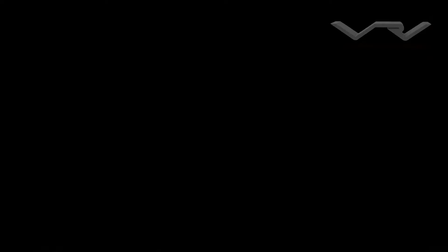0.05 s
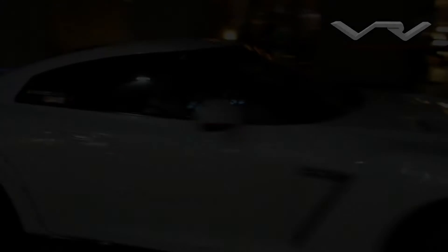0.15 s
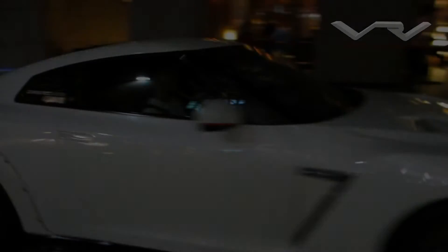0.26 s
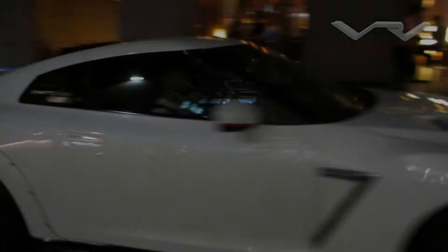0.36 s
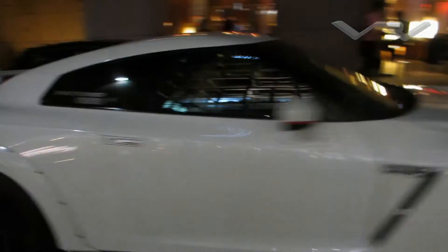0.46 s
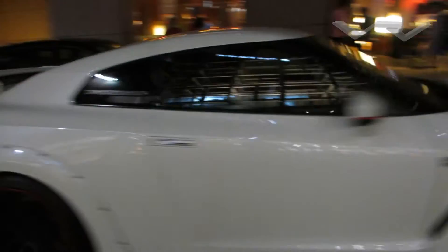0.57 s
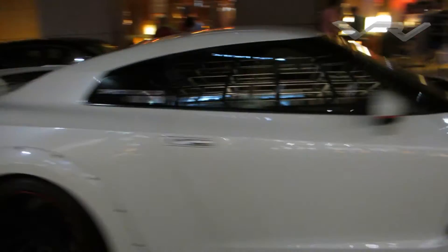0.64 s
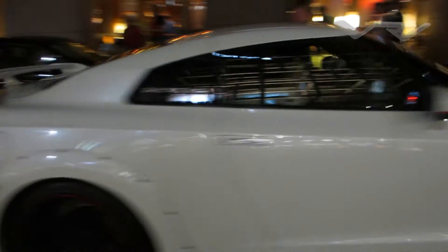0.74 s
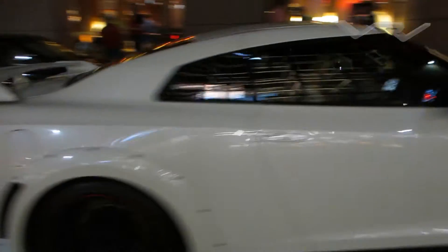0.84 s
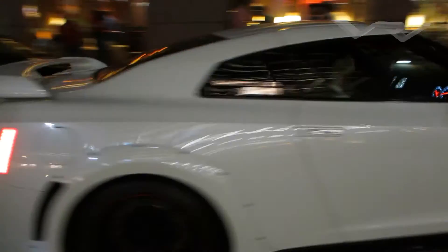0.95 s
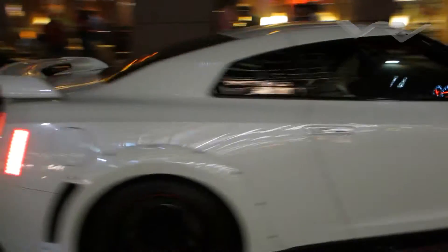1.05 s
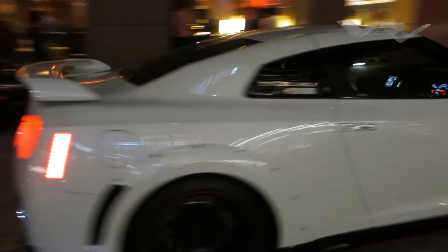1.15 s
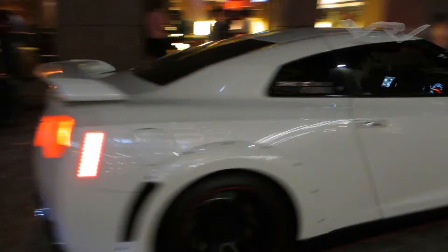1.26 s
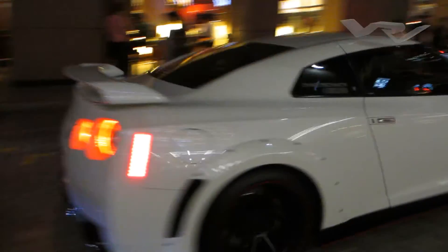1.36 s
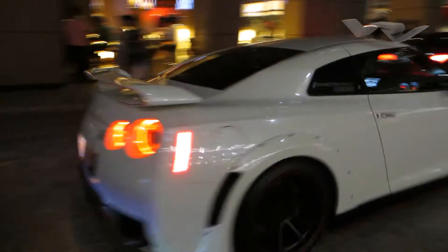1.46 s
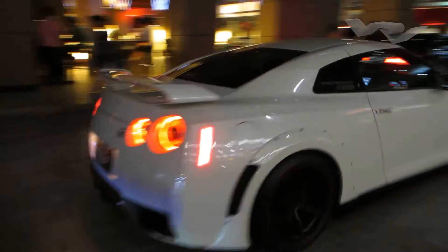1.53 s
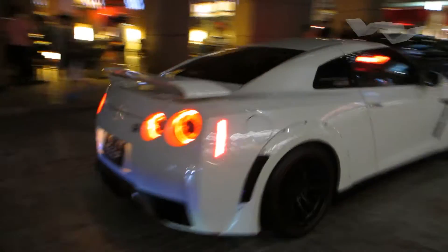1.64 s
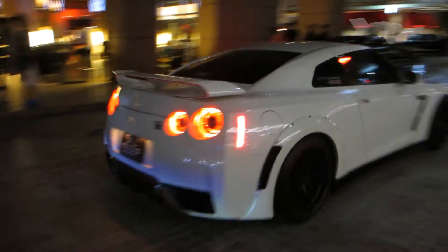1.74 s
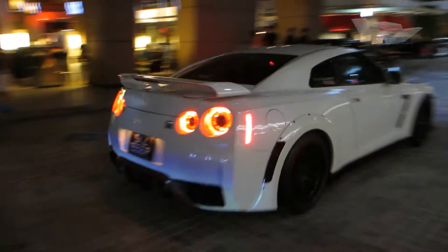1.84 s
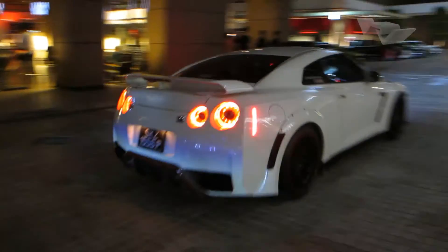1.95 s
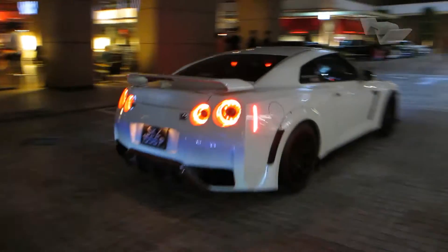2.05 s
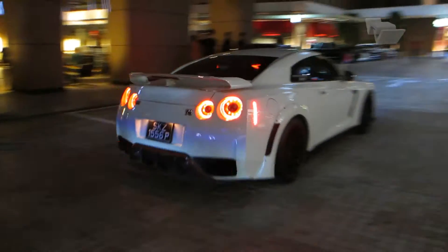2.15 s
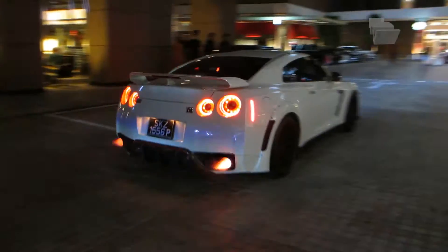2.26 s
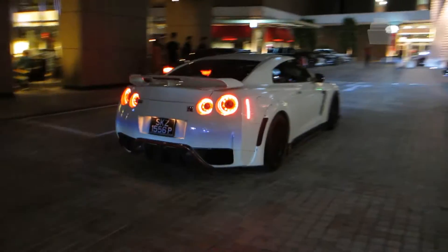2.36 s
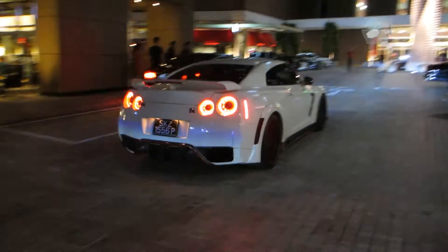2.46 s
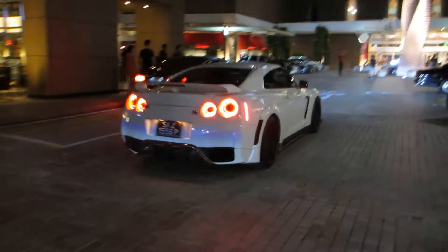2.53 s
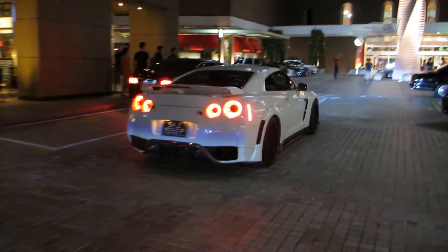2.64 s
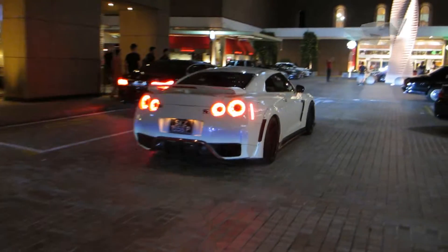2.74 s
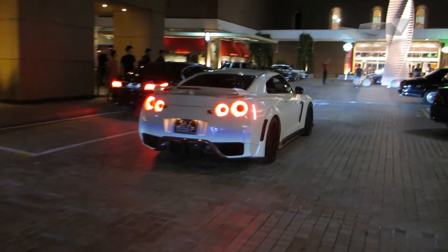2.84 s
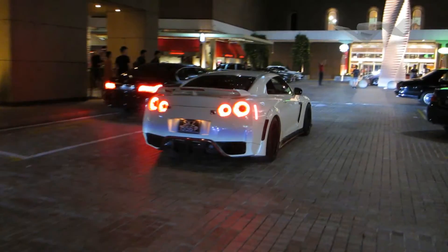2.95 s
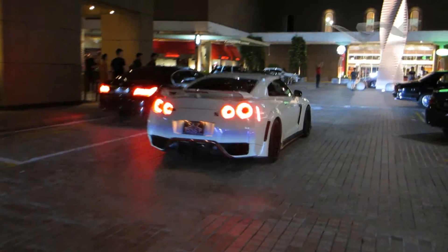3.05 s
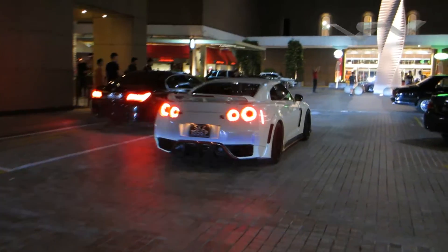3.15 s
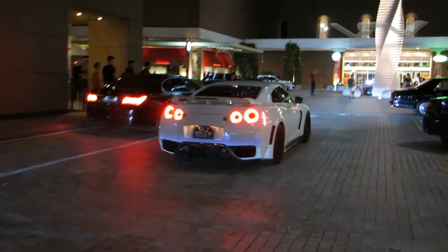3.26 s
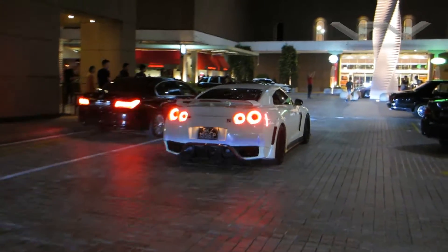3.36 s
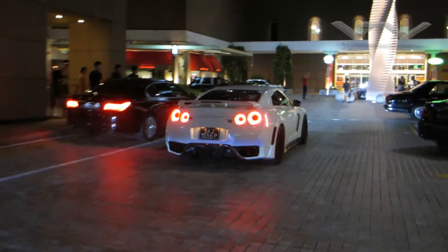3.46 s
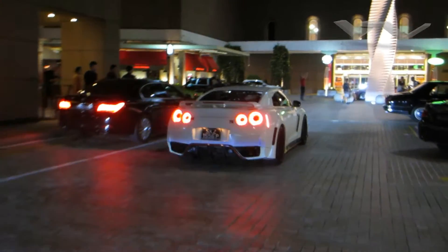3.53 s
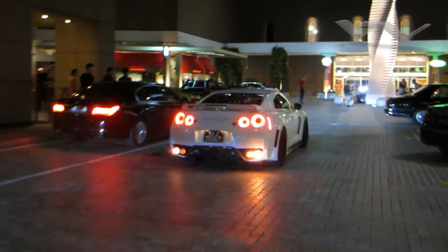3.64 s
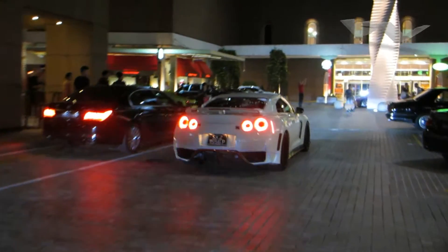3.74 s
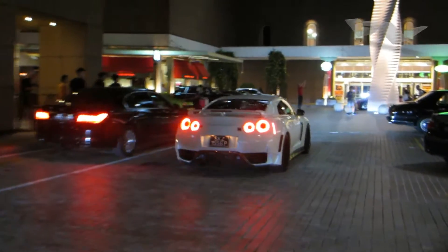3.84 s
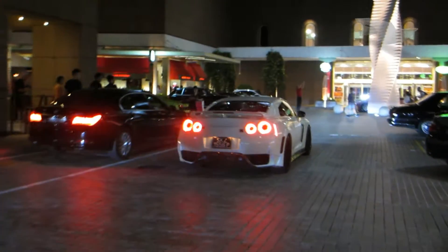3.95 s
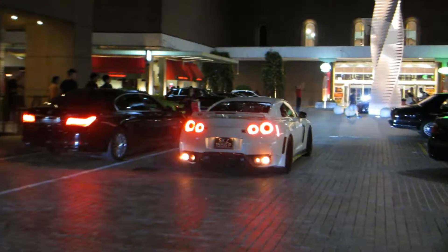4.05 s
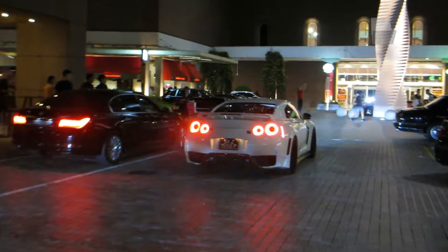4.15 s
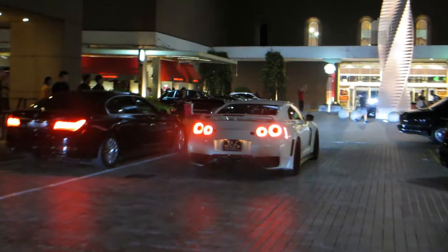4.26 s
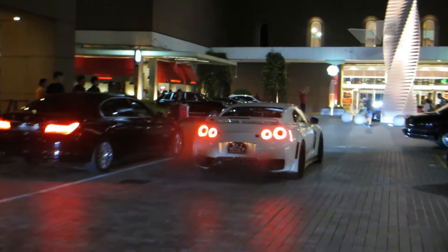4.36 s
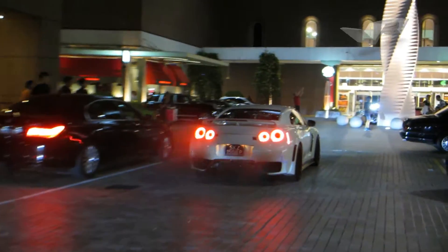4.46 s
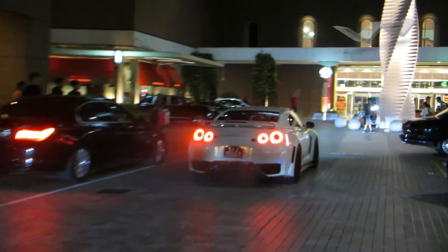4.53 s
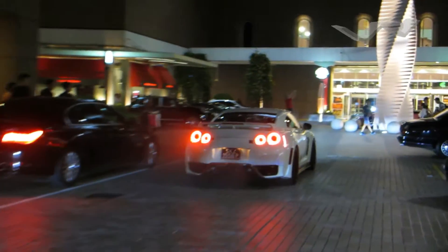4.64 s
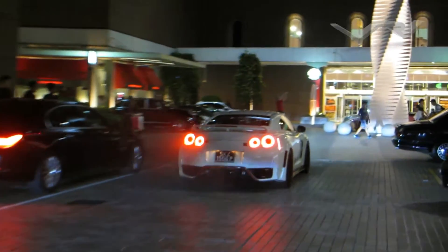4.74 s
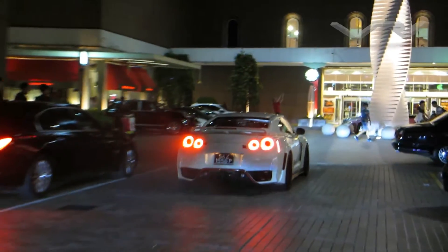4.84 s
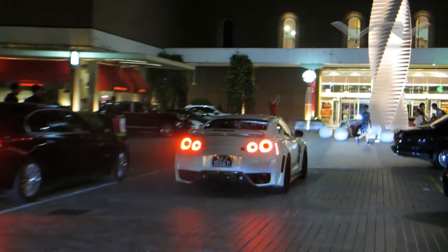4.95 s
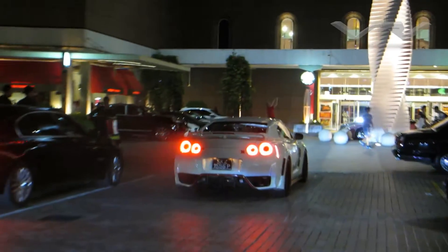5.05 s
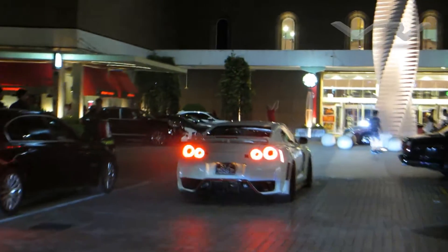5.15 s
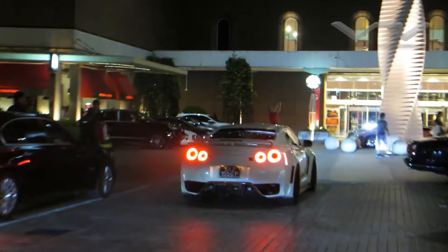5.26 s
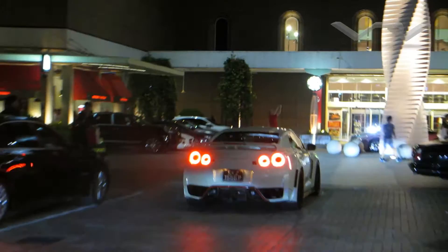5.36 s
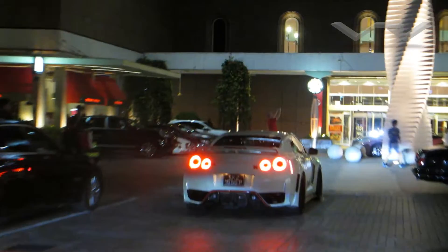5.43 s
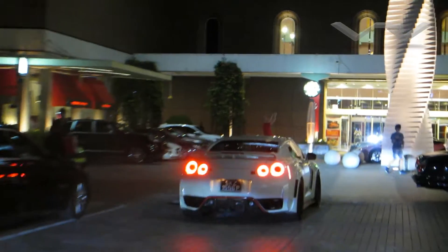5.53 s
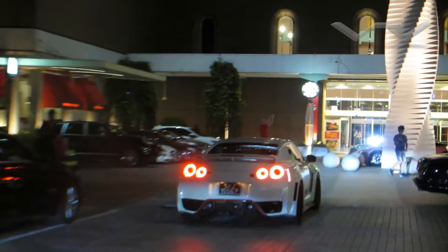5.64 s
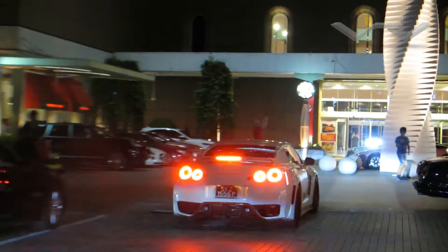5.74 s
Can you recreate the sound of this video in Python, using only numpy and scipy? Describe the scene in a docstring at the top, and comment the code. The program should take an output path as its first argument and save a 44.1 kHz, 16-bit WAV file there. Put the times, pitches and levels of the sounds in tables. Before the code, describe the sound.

After a brief silence, a tuned turbo engine murmurs close by, lugs as the clutch bites, then climbs into a raspy snarl. Lifting off sets off a volley of sharp cracks and pops. A shorter second rev brings heavier bangs echoing off buildings, then a quick blip and soft pops as the car rolls away. Outdoor paved forecourt, handheld stereo pickup, car leaning right.

```python
"""A tuned turbo V6 murmurs at low speed, lugs as the clutch bites, then snarls away over a forecourt.
It revs twice strongly and once briefly: speed and throttle shape the firings, which ring the
silencer and tailpipes. Unburnt fuel bangs, pops and burbles, mostly off the throttle, as decaying
rings, thumps and noisy cracks. Filtered noise makes the hiss; a wavering tone, the faint turbo.
Delayed copies and fading noise throw the sound back from the surroundings as the car rolls off."""
import sys
import numpy as np
from scipy import signal
from scipy.fft import rfft, irfft, next_fast_len
from scipy.io import wavfile
from scipy.ndimage import uniform_filter1d

SR = 44100
rng = np.random.default_rng(int(sys.argv[2]) if len(sys.argv) > 2 else 0)


def transcribe(u):
    """Save the signal u as a 16-bit wav file named by the first command-line argument.

    u: samples, shape (n,) or (channels, n), limited to [-1, 1]; the rate is SR.
    q: integer samples, one column per channel.
    """
    v = np.clip(np.atleast_2d(u).T, -1, 1)
    q = np.round(v * 32767).astype(np.int16)
    wavfile.write(sys.argv[1], SR, q)


N = 255559
TIME = np.arange(N) / SR
SIDE_PAIR = np.array([[1], [-1]])  # the same sound, flipped between left and right


def undb(db):
    """Decibels to gain."""
    return 10 ** (np.asarray(db) / 20)


def unit(x):
    """Scale to an average (rms) strength of 1."""
    return x / np.sqrt(np.mean(x ** 2))


def curves(rows):
    """The columns of a table, joined by straight lines in time."""
    s, *columns = np.transpose(rows)
    return [np.interp(TIME, s, c) for c in columns]


def walk(rate):
    """Smooth random wandering of rms 1, with a new random step `rate` times a second."""
    k = int(SR / rate)
    steps = np.repeat(rng.standard_normal(N // k + 1), k)
    smooth = uniform_filter1d(uniform_filter1d(steps, k), k)
    return unit(smooth[:N])


def resonate(x, hz, width):
    """A steep resonance: one band-pass applied twice."""
    b, a = signal.iirpeak(min(hz, .45 * SR), hz / width, fs=SR)
    once = signal.lfilter(b, a, x + 1e-18)
    return signal.lfilter(b, a, once)


def lowpass(x, hz):
    """A gentle one-pole treble roll-off."""
    return signal.lfilter(*signal.butter(1, hz, fs=SR), x + 1e-18)


def tint(x, hz, db):
    """Colour a sound with gains in dB at the given frequencies."""
    size = next_fast_len(N, True)
    f = np.maximum(np.fft.rfftfreq(size, 1 / SR), 1)
    gain = undb(np.interp(np.log(f), np.log(hz), db))
    return irfft(rfft(x, size) * gain, size)[:N]


def noise(colour):
    """Noise of rms 1, coloured by a table of (pitch_hz, level_db)."""
    return unit(tint(rng.standard_normal(N), *np.transpose(colour)))


def strike(pulses, modes):
    """Each pulse rings a set of pipe modes, peaking at its own size."""
    click = signal.unit_impulse(SR // 20)
    # neighbouring modes have opposite signs
    ring = sum((-1) ** k * undb(db) * resonate(click, hz, width)
               for k, (hz, width, db) in enumerate(modes))
    return signal.fftconvolve(pulses, ring / np.abs(ring).max())[:N]


def place(x, side, bass_side, corner_hz=510):
    """Lean a sound to the right by level, with a different lean in the bass."""
    s = side * x + bass_side * lowpass(x, corner_hz)
    return np.array([x - s, x + s])


# presses of the throttle: down_s, up_s, depth (0-1)
PRESSES = [(0.932, 1.866, 0.62), (2.975, 3.519, 0.56), (4.48, 4.692, 0.23)]
THROTTLE_OPEN_S, THROTTLE_CLOSE_S = 0.21, 0.079


def throttle():
    """Pedal position 0-1: each press opens, holds and closes."""
    total = 0
    for down, up, depth in PRESSES:
        opening = np.clip((TIME - down) / THROTTLE_OPEN_S, 0, 1)
        closing = np.clip(1 - (TIME - up) / THROTTLE_CLOSE_S, 0, 1)
        total = total + depth * opening * closing
    return np.clip(total, 0, 1)


# engine speed: time_s, firing_rate_hz
SPEED = [(0.64, 50.43), (0.91, 52.75), (1.0, 58.76), (1.07, 69.6), (1.196, 98.7), (1.268, 107.4),
         (1.344, 112.9), (1.496, 121.8), (1.55, 131.1), (1.752, 152.8), (1.786, 161.2), (1.848, 183),
         (1.95, 199.9), (2.55, 185.8), (3.0, 141.8), (3.156, 143.6), (3.248, 148.5), (3.344, 157.2),
         (3.426, 169.5), (3.482, 182), (3.53, 198), (3.72, 186), (4.45, 112.9), (4.52, 126), (4.62, 163.6),
         (4.7, 181.1), (5.01, 146.5), (5.5, 115), (5.7, 81.8)]
# base loudness that the exhaust sounds follow: time_s, level_db
LOUDNESS = [(0.41, -55.5), (0.52, -44), (0.78, -31.5), (1.13, -35), (1.28, -29.5), (1.48, -29), (1.58, -25),
            (1.66, -28), (1.85, -21.5), (1.91, -24), (2.3, -37), (2.65, -41), (3.08, -35), (3.35, -28.5),
            (3.46, -24), (3.6, -28), (4.0, -43), (4.42, -38), (4.6, -29.5), (4.9, -42.5), (5.45, -45.5),
            (5.66, -44.5), (5.72, -40), (5.79, -47.5)]
# misfires, brief jolts in level, mostly dips: time_s, change_db
MISFIRES = [(1.543, -2), (1.589, 0.5), (1.737, -9.5), (1.886, -3.5), (1.914, 1), (2.012, -5), (2.054, -8),
            (3.369, -9), (3.406, -5), (3.508, -7), (3.546, -9.5), (3.565, 4), (3.622, -4), (3.733, -0.5)]
MISFIRE_S = .008
# the tailpipes swing round to face the listener: from_s, to_s
TURN_S = (0.99, 3.31)


def driving():
    """Firing rate, loudness with misfires, throttle, and how far the tailpipes face us (0-1)."""
    misfire_db = sum(db * np.exp(-((TIME - s) / MISFIRE_S) ** 2) for s, db in MISFIRES)
    hz, = curves(SPEED)
    loud_db, = curves(LOUDNESS)
    return hz, loud_db + misfire_db, throttle(), np.interp(TIME, TURN_S, [0, 1])


# how the exhaust radiates the engine note: pitch_hz, beside_car_db, behind_car_db
PIPE_COLOUR = [(49.2, -2, 6.5), (57, 19.5, 6), (68.5, 21.5, 6), (84, 15, -17), (116, 5, -5.5),
               (138.4, -5, 10), (198, 6, -6.5), (265, 19.5, 0.5), (350.3, 2.5, 13), (434, -16, 3),
               (494, -10.5, 8), (575, 2, 17.5), (674, -17.5, 9.5), (714, -13, -7.5), (820, -10, -21),
               (860, -5.5, -22), (980, -14, -15), (1110, -12, -7), (1260, 13.5, -27.5), (1500, -2, -29)]
CRUISE_HZ = 140  # reference pitch for counting octaves
NOTE_SHUT_DB, DULLING_SHUT_DB = -5.5, -9.5  # throttle shut: overall, and per octave above cruise


def order_levels(hz, loud_db, load, behind, count=8):
    """Each multiple of the firing rate swells at pipe resonances; high ones fade off the throttle."""
    pipe_hz, beside_db, behind_db = np.transpose(PIPE_COLOUR)
    levels = []
    for k in range(1, count + 1):
        side = np.interp(np.log(k * hz), np.log(pipe_hz), beside_db)
        rear = np.interp(np.log(k * hz), np.log(pipe_hz), behind_db)
        shut_db = NOTE_SHUT_DB + DULLING_SHUT_DB * np.log2(np.maximum(k * hz / CRUISE_HZ, 1))
        levels.append(loud_db + side + behind * (rear - side) + (1 - load) * shut_db)
    return levels


def note(turns, order_db, scatter, flutter_db=3.5, wobble=0.92):
    """Sines at multiples of the firing rate, which waver when combustion is uneven."""
    out = 0
    for k, db in enumerate(order_db, 1):
        level = undb(db + flutter_db * min(k, 3) * scatter * walk(50))
        phase = 2 * np.pi * k * turns + wobble * k * scatter * walk(40)
        out = out + level * np.sin(phase)
    return np.sqrt(2) * out


# how the exhaust radiates the snarl: pitch_hz, beside_car_db, behind_car_db
SNARL_COLOUR = [(70, -19, -32), (181, -13, -31), (260, -13, -20), (350, -6, -12), (430, -20, -12),
                (530, -13, -8), (600, -9, -2), (680, -15, -8), (800, -10, -20), (960, -20, -28),
                (1110, -26, -21), (1250, -30, -36), (1620, -47, -45.5), (3500, -60, -54)]
# strength of its lines before colouring: on_order_db, sixth_off_db, third_off_db, halfway_db
SNARL_LINES_DB = (-12, -9, -5, -1)


def snarl(turns, level_db, behind, count=120, size=4096):
    """Six unequal firings repeat every engine cycle, adding clean lines between the firing orders."""
    k = np.arange(1, count + 1)
    line_db = np.array(SNARL_LINES_DB)[np.minimum(k % 6, -k % 6)]
    lines = undb(line_db) * np.exp(2j * np.pi * rng.random(count))
    cycle = irfft(np.r_[0, lines], size) * size / np.sqrt(2)
    wave = np.interp(turns / 6, np.arange(size) / size, cycle, period=1)
    hz, beside_db, behind_db = np.transpose(SNARL_COLOUR)
    beside = (1 - behind ** 2) * tint(wave, hz, beside_db)
    rear = behind ** 2 * tint(wave, hz, behind_db)
    return undb(level_db) * (beside + rear)


# each part of the roar against the loudness: level_db, speed_db_per_octave, full_throttle_db,
# from_behind_db, strain_db_per_octave (above cruise, at full throttle)
ROAR_LAW = {"boom": (-4.5, -3.5, -18, 0.5, -6), "silencer": (3, 1, -18, -8.5, 3),
            "tailpipe": (-9.5, 0, -12, 6, 0), "rasp": (-9, 3, -20, -6, 27), "gas": (-25, -1, -17, -4, 25)}


def roar_levels(hz, loud_db, load, behind):
    """Speed, throttle and direction set each part's level; the rasp and gas grow under strain."""
    octaves = np.log2(hz / CRUISE_HZ)
    strain = load * np.maximum(octaves, 0)
    levels = {}
    for part, (db, speed_db, load_db, turn_db, strain_db) in ROAR_LAW.items():
        change_db = speed_db * octaves + load_db * load + turn_db * behind + strain_db * strain
        levels[part] = loud_db + db + change_db
    return levels


# exhaust resonances, low to high; width is that of each of two passes: pitch_hz, width_hz, level_db
BOOM = [(66.5, 28, 13), (146.6, 66, 9.5)]
SILENCER = [(262, 75, -2), (335, 75, 0)]
TAILPIPE = [(585, 110, 0), (690, 140, -9)]
RASP = [(820, 220, 0), (1060, 320, -2), (1310, 300, -1)]
GAS = [(1640, 530, 2), (2500, 700, -4)]


def roar(turns, scatter, level_db, bank=0.077, lump=0.041, jitter_s=0.00088, puff=0.59):
    """Six unequal cylinders fire into the exhaust; a puff of turbulent gas follows each firing."""
    at = np.flatnonzero(np.diff(np.floor(turns)))
    chance = rng.standard_normal((len(at), 2))
    cylinder = np.arange(len(at))
    uneven = bank * (-1) ** cylinder + lump * np.cos(2 * np.pi * cylinder / 3)
    size = 1 + uneven + scatter[at] * chance[:, 0]
    late = (jitter_s * SR * scatter[at] * chance[:, 1]).astype(int)
    pulses = np.zeros(N)
    np.add.at(pulses, np.clip(at + late, 0, N - 1), size * np.sqrt(np.gradient(at)))
    puff_size = np.exp(-(turns % 1) / puff) * np.interp(np.arange(N), at, size)
    gas = unit(puff_size * rng.standard_normal(N))
    # at idle speed the flow between firings is steady and smooth
    idling = np.clip(1.6 - np.gradient(turns) * SR / 90, .15, 1)
    gas = (1 - idling) * gas + idling * rng.standard_normal(N)

    def section(modes, db, gas_share):
        """One group of resonances, driven by firings and gas; little passes above its top mode."""
        drive = pulses + gas_share * gas
        # neighbouring pipe modes leave the outlet in opposite phase
        ring = sum((-1) ** k * undb(g) * resonate(drive, hz, width) / np.sqrt(width)
                   for k, (hz, width, g) in enumerate(modes))
        top_cut = signal.butter(3, 1.3 * modes[-1][0], fs=SR, output="sos")
        ring = signal.sosfilt(top_cut, ring)
        # even out the strength, so that the level alone sets the loudness
        power = uniform_filter1d(ring ** 2, size=6000)
        return undb(db) * ring / np.sqrt(np.abs(power) + 1e-12)

    return (section(BOOM, level_db["boom"], gas_share=0.89)
            - section(SILENCER, level_db["silencer"], gas_share=0.052)
            + section(TAILPIPE, level_db["tailpipe"], gas_share=0.7)
            + section(RASP, level_db["rasp"], gas_share=2.3)
            + section(GAS, level_db["gas"], gas_share=7.4))


# scatter of the firings: small under load, growing with speed when the throttle is shut
LOAD_SCATTER, OVERRUN_SCATTER = 0.06, 0.58
THROB = .2  # depth of the note's throb (0-1)
SNARL_DB, SNARL_SHUT_DB = 1.5, -13  # against the loudness, and its change with the throttle shut


def engine():
    """Note, snarl, lugging, roar, barks and spat gas, all following the same engine speed."""
    hz, loud_db, load, behind = driving()
    shut = (1 - load) ** 2
    scatter = LOAD_SCATTER + OVERRUN_SCATTER * shut * (1 - load / 2) * (hz / CRUISE_HZ) ** 1.18
    turns = np.cumsum(hz) / SR  # firings so far; six make one engine cycle
    tone = note(turns, order_levels(hz, loud_db, load, behind), scatter)
    # the cylinders pull unequally, so the note throbs once per engine cycle
    tone = tone * (1 + THROB * np.sin(2 * np.pi * turns / 6))
    tone = tone + snarl(turns, loud_db + SNARL_DB + SNARL_SHUT_DB * shut, behind) + lugging(turns)
    exhaust = roar(turns, scatter, roar_levels(hz, loud_db, load, behind))
    exhaust = exhaust + barks() + spitting(turns, hz, loud_db, load)
    return tone, exhaust


# steady whistle: pitch until the flare, level against the loudness, and how fast the pitch then sinks
TURBO_HZ, TURBO_DB, TURBO_SAG_HZ_PER_S2 = 6440, -60, 1100
FLARE_S, FLARE_DB, FLARE_ATTACK_S, FLARE_FADE_S = 4.56, -60, .02, .09


def turbo(spread_hz=1000):
    """A breathy, flickering whistle that flares briefly during the last short rev, then sinks."""
    since = np.maximum(TIME - FLARE_S, 0)
    phase = 2 * np.pi * np.cumsum(TURBO_HZ - TURBO_SAG_HZ_PER_S2 * since ** 2) / SR
    whistle = unit(walk(spread_hz) * np.sin(phase) + walk(spread_hz) * np.cos(phase))
    flare = undb(FLARE_DB) * np.minimum(since / FLARE_ATTACK_S, 1) * np.exp(-since / FLARE_FADE_S)
    steady = undb(curves(LOUDNESS)[0] + TURBO_DB)
    return (steady + flare) * whistle


# forecourt reverberation; t60_s is the time to fade by 60 dB: pitch_hz, t60_s, level_db
COURT = [(83, 0.41, -8.5), (173, 0.59, 14.5), (396, 1.6, 4.5), (740, 0.32, 5.5), (1300, 0.43, -9.5),
         (3070, 0.45, -17), (6400, 0.52, -36), (12800, 0.23, -22)]


def forecourt(x, build_s=0.039):
    """Diffuse reverberation among the buildings: two unlike trails of fading noise."""
    t = np.arange(SR) / SR
    f = np.maximum(np.fft.rfftfreq(SR, 1 / SR), 1)
    white, response = rfft(rng.standard_normal((2, SR))), 0
    centres = np.log([row[0] for row in COURT])
    # each share picks out one band, overlapping its neighbours
    for share, (_, t60, db) in zip(np.eye(len(COURT)), COURT):
        band = irfft(white * np.interp(np.log(f), centres, share), SR)
        response = response + undb(db) * band * np.exp(-np.log(1000) * t / t60)
    response = response * (1 - np.exp(-t / build_s)) / np.sqrt(SR * .06)
    return signal.fftconvolve(x[None], response, axes=1)[:, :N]


# strength of the hiss before its left-right spread: time_s, level_db
HISS = [(0.39, -65), (0.7, -50.5), (1.05, -53), (1.3, -58.5), (1.7, -55.5), (2.8, -54.5), (3.3, -59),
        (3.5, -54), (3.74, -54), (3.85, -43), (4.7, -49), (5.2, -59), (5.79, -68)]
# its colour: pitch_hz, level_db
HISS_COLOUR = [(1500, 25), (3000, 11.5), (4200, 3), (6000, 0.5), (8500, -4.5), (11000, 0.5), (13000, -8.5),
               (16000, -2)]


def hiss():
    """Gas and tyres: wide, slightly flickering noise."""
    centre = place(noise(HISS_COLOUR), side=0.54, bass_side=0)
    wide = centre + undb(-5.5) * noise(HISS_COLOUR) * SIDE_PAIR
    return undb(curves(HISS)[0] + 0.55 * walk(60)) * wide


# what a lugging firing rings with: pitch_hz, width_hz, level_db
LUG_MODES = [(108, 83, 8), (226, 170, -1), (316, 130, -0.5)]
# middle and half-length of the lugging, typical peak level, spread of the firings
LUG_S, LUG_WIDTH_S, LUG_DB, LUG_SPREAD_DB = .95, .11, -11, 2.5


def lugging(turns):
    """Slow, heavy firings throb one by one while the clutch takes up the load."""
    at = np.flatnonzero(np.diff(np.floor(turns)))
    pulses = np.zeros(N)
    pulses[at] = undb(LUG_DB + LUG_SPREAD_DB * rng.standard_normal(len(at)))
    swell = np.exp(-((TIME - LUG_S) / LUG_WIDTH_S) ** 2)
    return strike(pulses * swell, LUG_MODES)


# dry ticks and sputters, as of grit, hot metal or spitting fuel; level before dulling: start_s, level_db
TICKS = [(0.996, -43), (1.036, -47), (1.053, -44), (1.069, -44), (1.111, -45.5), (1.469, -46),
         (5.449, -45.5)]


def ticks(decay_s=0.0014, dull_hz=4500):
    """Tiny dry clicks: noise that starts at once and dies away."""
    size = sum(undb(db) * (TIME >= s) * np.exp(-np.abs(TIME - s) / decay_s) for s, db in TICKS)
    return lowpass(size * rng.standard_normal(N), dull_hz)


# barks, one cylinder firing hard once per engine cycle as a rev climbs; spat gas before its colour:
# start_s, level_db, spat_gas_db
BARKS = [(1.505, -23, -56), (1.551, -13.5, -52), (1.596, -14, -52), (1.642, -20, -54), (1.687, -17, -50),
         (1.722, -15.5, -45), (1.76, -14.5, -43), (1.798, -12, -40), (1.834, -10, -31), (1.866, -14, -36),
         (1.895, -16, -38), (1.927, -11, -38), (3.451, -26, -42), (3.484, -24, -38), (3.516, -24, -41)]
# what a bark rings with: pitch_hz, width_hz, level_db
BARK_MODES = [(342, 140, -3), (620, 310, -5.5), (847, 200, 4), (1236, 206, -5.5)]


def barks(next_db=-4):
    """A hard firing and a weaker one right after it ring the tailpipes."""
    hz, = curves(SPEED)
    pulses = np.zeros(N)
    for s, db, _ in BARKS:
        at = int(s * SR)
        pulses[[at, at + int(SR / hz[at])]] = undb([db, db + next_db])
    return strike(pulses, BARK_MODES)


# pops at the exhaust; the row at 4.355 s is a crackling echo of the bang at 4.294 s;
# levels before the blast's gains: start_s, level_db, ring_hz, thump_db
POPS = [(1.749, -15.5, 765, -21), (2.068, -17, 380, -17), (2.106, -16.5, 1130, -24), (2.14, -15, 1180, -18),
        (2.276, -13.5, 385, -18), (2.4, -21, 452, -33), (2.432, -31, 600, -34), (2.46, -28.5, 416.4, -33.5),
        (3.019, -26.5, 570, -35), (3.378, -14.5, 659, -44.5), (3.416, -16.5, 540, -34),
        (3.53, -16.5, 635, -19), (3.576, -13.5, 573, -18), (3.592, -19, 598, -19), (3.643, -8.5, 603, -15),
        (3.698, -17, 646, -16), (3.746, -20, 570, -12), (3.757, -13, 610, -11), (4.355, -22, 570, -14),
        (4.485, -21, 680, -20), (4.537, -17, 700, -17), (4.578, -18, 560, -32), (4.619, -17, 670, -31),
        (4.977, -29, 557.7, -29), (5.19, -31.5, 570, -39), (5.263, -30.5, 532, -31), (5.441, -31, 540, -46),
        (5.539, -31, 566, -33), (5.578, -29.5, 560, -40), (5.678, -20.5, 556, -26.5),
        (5.692, -32.5, 540, -39)]
# colour of the spat gas: pitch_hz, level_db
SPIT_COLOUR = [(400, 0), (1300, 6.5), (1800, 4.5), (2900, 1), (3900, -14.5), (6300, -19), (8000, -31),
               (16000, -35.5)]
# gas from firings under load: level against the loudness and growth with speed, before its colour
SPIT_DB, SPIT_DB_PER_OCTAVE = -35, 28
SPIT_SHARE, SPIT_SPREAD_DB = .22, 3  # decay as a share of the firing gap, and spread of sizes
# decays, level for a full-scale pop before colour, and how steeply it follows the pop's size
BARK_SPIT_S, POP_SPIT_S, POP_SPIT_DB, POP_SPIT_POWER = .011, .004, -13, 1.9


def spitting(turns, hz, loud_db, load):
    """Gas tears out in sharp puffs: at firings under strain, harder in a bark, once with each pop."""
    def burst(s, decay_s):
        """A sudden start and a quick fade."""
        return (TIME >= s) * np.exp(-np.abs(TIME - s) / decay_s)

    firing = np.floor(turns).astype(int)
    puff_db = SPIT_SPREAD_DB * rng.standard_normal(N)[firing]
    puffs = unit(np.exp(-(turns % 1) / SPIT_SHARE) * undb(puff_db))
    strain = load * undb(loud_db + SPIT_DB + SPIT_DB_PER_OCTAVE * np.log2(hz / CRUISE_HZ))
    barking = sum(undb(db) * burst(s, BARK_SPIT_S) for s, _, db in BARKS)
    # loud pops spit far more than soft ones
    popping = sum(undb(POP_SPIT_DB) * undb(db) ** POP_SPIT_POWER * burst(s, POP_SPIT_S)
                  for s, db, _, _ in POPS)
    size = puffs * (strain + barking) + popping
    return tint(size * rng.standard_normal(N), *np.transpose(SPIT_COLOUR))


BURBLE_PER_S, BURBLE_HZ = 17, 556  # rate while it lasts, typical ring pitch
BURBLE_DB, BURBLE_SPREAD_DB = 4, 2.5  # against the loudness, before the blast's gains


def burble(count=90):
    """Small, loosely spaced pops with the throttle nearly shut at speed: start_s, level_db, ring_hz."""
    hz, loud_db, load, _ = driving()
    chance = rng.standard_normal((count, 3))
    times = (np.arange(count) + 0.16 * chance[:, 0]) / BURBLE_PER_S
    at = np.clip(times * SR, 0, N - 1).astype(int)
    overrun = (load[at] < .2) & (hz[at] > 90) & (times < TIME[-1])
    level_db = loud_db[at] + BURBLE_DB + BURBLE_SPREAD_DB * chance[:, 1]
    ring_hz = BURBLE_HZ * np.exp(.06 * chance[:, 2])
    return np.c_[times, level_db, ring_hz][overrun].tolist()


# bangs at the exhaust; the rows just after 4.294 s are crackling echoes of that bang;
# levels before the blast's gains: start_s, level_db, ring_hz, thump_db, crack_db
BANGS = [(1.896, -12, 1280, -42, -44.5), (1.925, -18, 905, -22, -45), (1.955, -7.5, 1180, -21, -39.5),
         (2.022, -9.5, 1090, -36, -35.5), (2.1605, -0.5, 1250, -43, -28), (2.167, -19, 487, -8.5, -31),
         (2.196, -5.5, 1110, -14, -35.5), (2.316, -2.5, 1135, -16.5, -29), (2.329, -6.5, 393.8, -21, -39),
         (3.765, 0.5, 597, -2.5, -29.5), (3.77, -14, 547, -42, -36.5), (3.798, -8, 700, -24, -41),
         (3.837, -10.5, 573, -20, -38), (3.876, -6.5, 580, -26, -31.5), (3.881, -18, 665, -29, -38.5),
         (3.917, -8.5, 645, -13.5, -35), (4.0964, -2.5, 610, -9.5, -31), (4.112, -1.5, 509, -14, -31),
         (4.294, -1.5, 605, -8, -29.5), (4.317, -20, 716, -34, -45.5), (4.335, -28, 640, -41, -44)]
BANG_CYCLES, POP_CYCLES = 3.17, 5.2  # length of the tailpipe's ring
POP_CRACK_DB, BURBLE_THUMP_DB = -72, -5  # against the pop's own level


def bangs_and_pops():
    """Bangs crack, pops are muffled, the burble is soft: six columns as unpacked in afterfire."""
    bangs = [(s, db, hz, BANG_CYCLES, crack_db, low_db) for s, db, hz, low_db, crack_db in BANGS]
    pops = [(s, db, hz, POP_CYCLES, db + POP_CRACK_DB, low_db) for s, db, hz, low_db in POPS]
    burbles = [(s, db, hz, POP_CYCLES, db + POP_CRACK_DB, db + BURBLE_THUMP_DB)
               for s, db, hz in burble()]
    return bangs + pops + burbles


# colour of the rolling flame: pitch_hz, level_db
FLAME_COLOUR = [(40, 0), (90, 12), (200, -4.5), (380, 17), (600, 13), (950, 2.5), (1300, -5), (1700, -31),
                (3000, -21), (6000, -65)]
CRACK_S = .0034  # time scale of the jet's crack


def afterfire(thump_hz=105, thump_s=0.0017, flame_s=0.015, flame_db=-11, body_hz=350, body_s=0.0023,
              body_db=-12, ring_db=-1.96, crack_db=1.5, thump_db=-1, sag=0.0047, ceiling=0.58,
              churn_db=11, churn_s=0.013, churn_width=0.77):
    """Each bang or pop has a short tailpipe ring, a silencer thump, a roll of flame and a gas jet."""
    t = np.arange(4096) / SR
    blast, flame, jet = np.zeros((3, N + len(t)))
    turbulence = rng.standard_normal(N + len(t))
    for s, db, hz, ring_cycles, jet_db, low_db in bangs_and_pops():
        span = slice(int(s * SR), int(s * SR) + len(t))
        # the ring sinks as the hot gas leaves the pipe
        ring_s = ring_cycles / hz
        cycles = hz * (t + sag * ring_s * (1 - np.exp(-t / ring_s)))
        ring_size = np.exp(-(t / ring_s) ** 1.6) * (1 - np.exp(-t / .0005))
        ring = -np.sin(2 * np.pi * cycles) * ring_size
        body = -np.sin(2 * np.pi * body_hz * t) * np.exp(-t / body_s)
        thump = np.cos(2 * np.pi * thump_hz * t) * (t / thump_s) * np.exp(1 - t / thump_s)
        blast[span] += undb(db) * (undb(ring_db) * ring + undb(body_db) * body)
        blast[span] += undb(low_db + thump_db) * thump
        # the escaping jet churns around the pitch of the ring
        churn = unit(resonate(turbulence[span], hz, churn_width * hz))
        blast[span] += undb(jet_db + churn_db) * churn * np.exp(-(t / churn_s) ** 2)
        flame_size = np.exp(-(t / flame_s) ** 2) * (1 - np.exp(-t / 0.0034))
        flame[span] += undb(db + flame_db) * flame_size
        jet_size = np.sqrt(t / CRACK_S) * np.exp(1 - (t / CRACK_S) ** 1.4)
        jet[span] += undb(jet_db + crack_db) * jet_size
    blast = blast[:N] + flame[:N] * noise(FLAME_COLOUR)
    # the strongest blasts flatten
    return ceiling * np.tanh(blast / ceiling), jet[:N]


# early echoes from paving, car and pillars; gain before dulling: delay_s, gain (plain factor)
ECHOES = [(.0095, 0.17), (0.0167, 0.025), (0.0249, 0.1), (.041, 0.17), (0.061, 0.035)]


def echoes(x, dull_hz):
    """Single delayed reflections from near surfaces, with softened treble."""
    copies = sum(gain * np.interp(TIME - s, TIME, x, left=0) for s, gain in ECHOES)
    return lowpass(copies, dull_hz)


# colour of a crack's scattered tail: pitch_hz, level_db
TAIL_COLOUR = [(300, -3.5), (700, 33), (1250, 20), (1700, 11.5), (2700, 5.5), (4000, -5.5), (6500, -10),
               (8500, -10), (11500, -8.5), (16000, -20)]
TAIL_BUILD_S = .02
TAIL_ROUGH_DB, TAIL_CLUSTER_DB = 2.3, 1.2  # unevenness: fine grain and slower clusters


def crack_tail(jet, t60=0.63, tail_db=4.0):
    """A crack scattered by the facades: dense, uneven noise that swells and dies away."""
    t = np.arange(SR) / SR
    decay = (np.exp(-np.log(1000) * t / t60) * (1 - np.exp(-t / TAIL_BUILD_S))) ** 2
    energy = signal.fftconvolve(jet ** 2, decay / decay.sum())[:N]
    uneven_db = TAIL_ROUGH_DB * walk(150) + TAIL_CLUSTER_DB * walk(45)
    size = undb(tail_db + uneven_db) * np.sqrt(np.abs(energy))
    centre = place(size * noise(TAIL_COLOUR), side=0.48, bass_side=.8)
    return centre + undb(-4.5) * size * noise(TAIL_COLOUR) * SIDE_PAIR


# colour of a bang's crack: pitch_hz, level_db
CRACK_COLOUR = [(300, -10), (1200, 14), (2700, 11), (4000, 1), (6500, -1), (8000, 2), (11500, 2),
                (16000, -4)]
# colour of the part of the crack that differs left to right: pitch_hz, level_db
CRACK_WIDTH = [(400, -12), (2500, 3), (5000, 0), (12000, -1), (16000, -8)]
# the jet feeding the crack's tail grows as the car moves off: time_s, level_db
TAIL_GAIN = [(2.0, 1), (2.3, 3), (3.8, 4.5), (4.3, 9)]


def scene():
    """The car ahead and to the right, its sound thrown back mostly from the right."""
    tone, exhaust = engine()
    blast, jet = afterfire()
    bangs = blast + jet * noise(CRACK_COLOUR)
    wash, spread = forecourt(undb(-12.0) * blast + undb(-8.5) * exhaust)
    direct = place(tone + exhaust + turbo() + ticks(), side=0.48, bass_side=1.1)
    direct = direct + place(bangs, side=0.36, bass_side=0.48)
    reflected = place(wash + echoes(bangs, dull_hz=6000), side=0.88, bass_side=0.72)
    reflected = reflected + crack_tail(undb(curves(TAIL_GAIN)[0]) * jet)
    # the jet's turbulence and the diffuse echo differ from left to right
    width = undb(-8.5) * spread + undb(-9.5) * jet * noise(CRACK_WIDTH)
    return direct + reflected + hiss() + width * SIDE_PAIR


START_S, TOP_HZ = 0.387, 15850  # when the sound opens, and where the treble is cut


def record(dry, bass_cut_hz=36):
    """The sound opens abruptly; deep bass is shed, peaks beyond full scale clip, the top is cut."""
    opened = dry * np.clip((TIME - START_S) / 0.0053, 0, 1)
    bass_cut = signal.butter(2, bass_cut_hz, "high", fs=SR, output="sos")
    clipped = np.clip(signal.sosfilt(bass_cut, opened), -1, 1)
    top_cut = signal.ellip(8, .2, 70, TOP_HZ, fs=SR, output="sos")
    return signal.sosfilt(top_cut, clipped)


dry = scene()
out = record(dry)
transcribe(out)
```